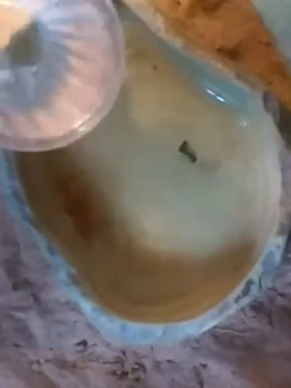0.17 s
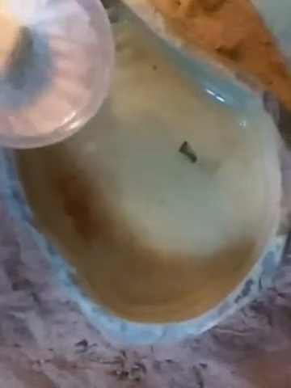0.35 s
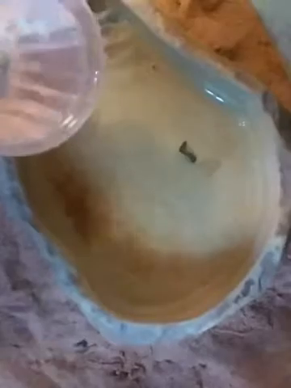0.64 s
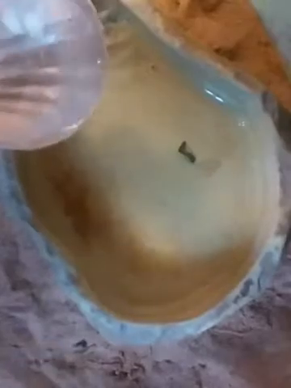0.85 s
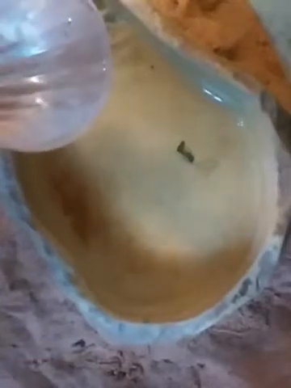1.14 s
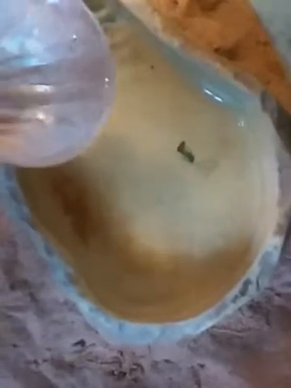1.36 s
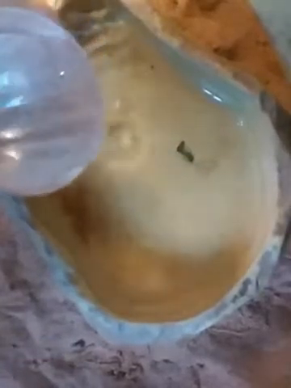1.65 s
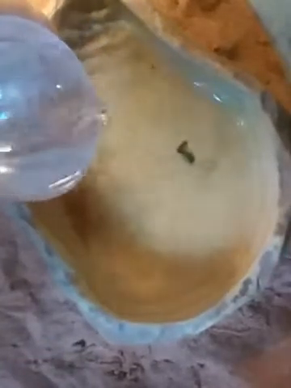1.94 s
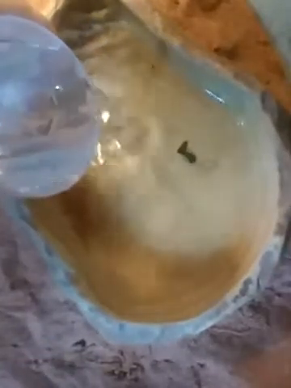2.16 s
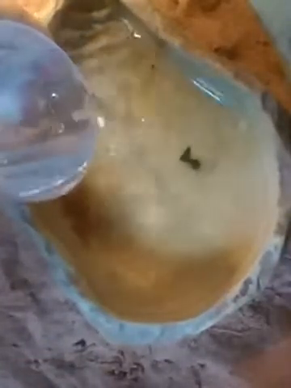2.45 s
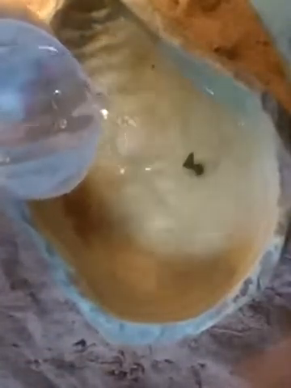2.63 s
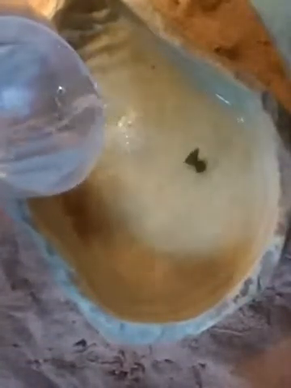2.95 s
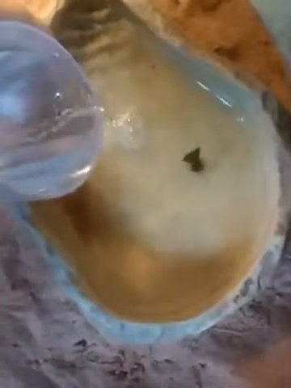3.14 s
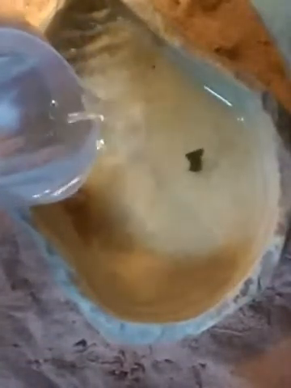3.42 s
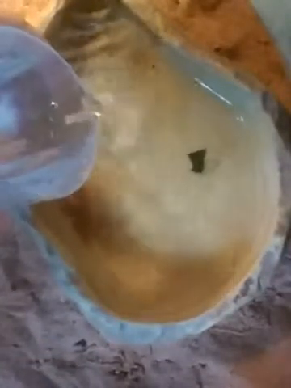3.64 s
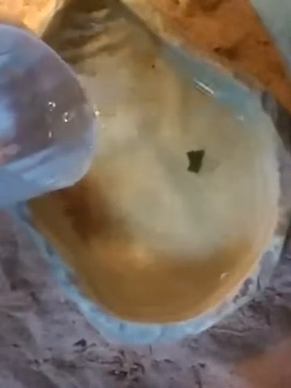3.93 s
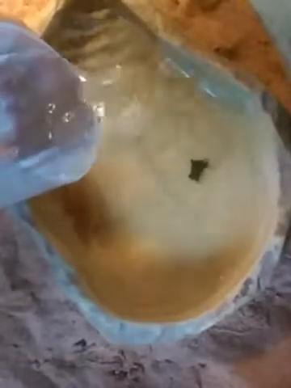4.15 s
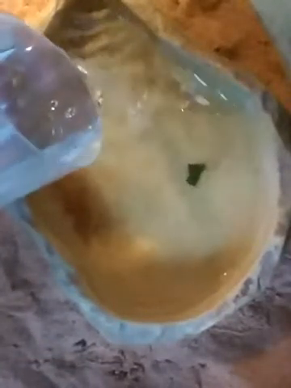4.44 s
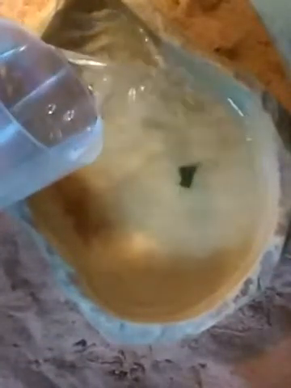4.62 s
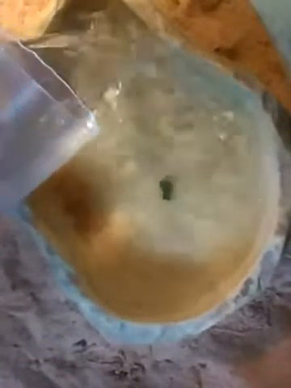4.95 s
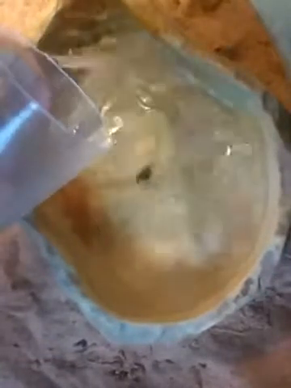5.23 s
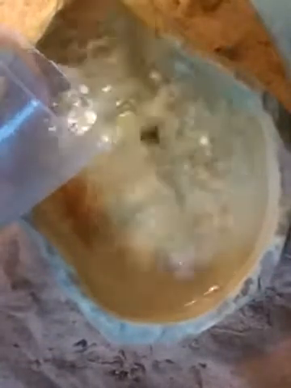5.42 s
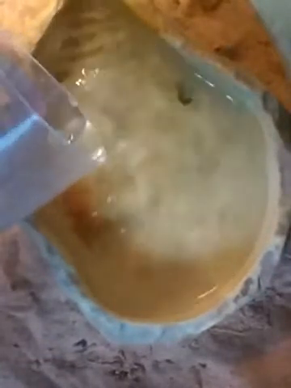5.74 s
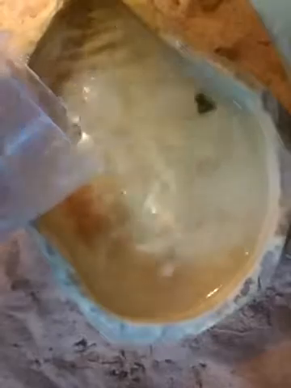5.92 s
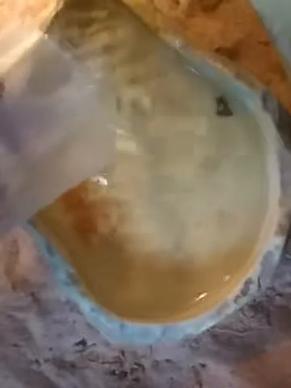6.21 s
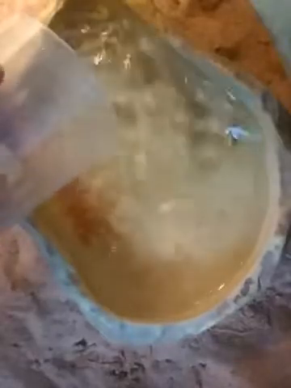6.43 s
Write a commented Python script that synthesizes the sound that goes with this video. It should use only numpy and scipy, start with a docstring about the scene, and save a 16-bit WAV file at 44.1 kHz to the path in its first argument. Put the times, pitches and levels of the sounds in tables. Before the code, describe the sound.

A small room with faint hiss and low, wavering rumble, heard through a small close microphone. Tiny handling taps come first, then a dull, boomy bump on a wooden table at 0.4 s. From 0.8 s a very faint, grainy scrape grows with light taps, a sharper tap at 1.16 s, and ends in a loud, hard wooden clack at 1.24 s that rattles and rings for under half a second. Near quiet follows, with a faint tap at 1.6 s. At 1.8 s the first drop ticks and plinks; from 2.1 s to 4 s drops and broken dribbles come in spurts, bubbles ringing around 1 to 1.6 kHz, often gliding upward, with crisp bright splashes. A strong plink lands at 3.5 s and a bright splash at 3.8 s. After 4.1 s the water is softer, smoother and quieter, trickling in short surges with weak drips until 6.5 s.

```python
"""Water is tipped from a plastic cup into a shallow dish: single drops, then a broken dribble, then a smoother stream.
Each drop slaps the surface with noise and may trap air bubbles, which ring as short sines with gliding pitch.
Before the water, dull bumps, a faint scrape and a hard clack are heard on wooden furniture.
The wood sounds as dying sines plus a dense rattle of noise; the scrape is grainy noise that grows.
A small room echoes the water and the bumps, over filtered noise for its hiss and low, wavering rumble."""
import sys
import numpy as np
from scipy import signal
from scipy.fft import rfft, irfft
from scipy.io import wavfile
from scipy.ndimage import uniform_filter1d

SR = 44100
rng = np.random.default_rng(int(sys.argv[2]) if len(sys.argv) > 2 else 0)


def to_wav(s):
    """Save 16-bit WAV."""
    ch = np.atleast_2d(s).T  # columns
    pcm = np.round(np.clip(ch, -1, 1) * 32767)  # PCM
    wavfile.write(sys.argv[1], SR, pcm.astype(np.int16))


N = 289723
TIME = np.arange(N) / SR

# colour of the room's hiss and rumble: [f/Hz, relative level/dB]
AIR_COLOUR = [(25, -15.5), (55, -7), (90, -3), (120, -2.5), (180, -10), (240, 2), (330, -16), (600, -12),
              (1200, -20), (3000, -27), (6000, -25), (15000, -29.5)]
# dull bumps against the table: [t/s, boom level/dB, body level/dB, rap level/dB, click level/dB, contact time/s]
BUMPS = [(0.085, -93, -48.5, -75, -96, 0.0029), (0.338, -75, -48, -53, -54.5, 0.0079),
         (0.394, -24, -27.5, -31, -44, 0.00077), (1.922, -55, -45, -48, -70.5, 0.0047)]
# hard knocks and handling taps on wood: same columns as the bumps
KNOCKS = [(0.184, -82, -89, -79, -56, 0.0097), (0.197, -69, -92, -63, -48, 0.0035),
          (0.223, -80, -99, -67, -56, 0.0032), (0.248, -73, -80.5, -58.5, -40.5, 0.0024),
          (0.302, -70, -81, -69, -53, 0.0023), (0.808, -63, -75, -83, -52.5, 0.0014),
          (0.885, -59.5, -68.5, -74.5, -55.5, 0.019), (0.991, -58, -42, -45, -48.5, 0.0099),
          (1.058, -41.5, -33.5, -36, -35, 0.014), (1.158, -43.5, -44.5, -42, -19, 0.012),
          (1.19, -40.5, -41, -38, -37, 0.0037), (1.240, -23.5, -22, -18.5, -12.5, 0.0042),
          (1.569, -50, -46, -57.5, -50, 0.0046)]
# pitches at which the boom, body, rap and click levels apply: [f/Hz]
BLOW_RANGES = [125, 300, 1100, 4500]
# notes of the bumped table: [f/Hz, relative level/dB, time to fall 60 dB/s]
TABLE_MODES = [(118.7, 2.5, 0.32), (163, -4.5, 0.42), (227, -5, 0.41), (260.7, 1.5, 0.32), (404, 0, 0.23),
               (570, -4, 0.089), (820, -17, 0.063), (1057, 5.5, 0.031), (1270, 6.5, 0.034),
               (1950, 1.5, 0.093)]
# notes of the knocked wood: [f/Hz, relative level/dB, time to fall 60 dB/s]
WOOD_MODES = [(114.5, 1.5, 0.49), (205, -1.5, 0.42), (248.3, -2, .65), (360, -14, 0.7), (412.4, -7.5, 0.52),
              (468, -4.5, 0.27), (601, -6.5, 0.39), (728, -10.5, 0.27), (832, -12, 0.23),
              (1000, -10.5, 0.4), (1395, -16.5, 0.07), (2283, -15, 0.12), (2880, -11, 0.17),
              (3486, -16.5, 0.13), (4220, -14, 0.18), (4640, -20, 0.098)]
# dense rattle of struck wood:
# [f/Hz, relative level/dB, time to fall 60 dB/s, relative level of slow tail/dB, tail's time to fall 60 dB/s]
RATTLE = [(61, -29, 0.094, -18, 0.27), (114, -12.5, 0.18, -4.5, 0.86), (283, -13, 0.073, -4, 0.59),
          (580, -9, 0.1, -4.5, .5), (1200, -11, 0.11, -8.5, 0.39), (2280, -10, 0.14, -7.5, 0.23),
          (3700, -9.5, 0.11, -17, 0.48), (6250, 2, 0.072, -19.5, 0.34), (8940, -13.5, 0.074, -20.5, 0.4),
          (15000, -31, 0.031, -18, 0.3)]
# colour of the room's echo: [f/Hz, relative level/dB, time to fall 60 dB/s]
ROOM_COLOUR = [(155, 1, 0.25), (1100, 6, 0.19), (2550, 9.5, 0.21), (5350, 0.5, 0.22), (9100, 0, 0.36),
               (15000, -7.5, 0.14)]
# when something slides over the wood: [start t/s, end t/s]
SLIDE_SPAN = (.81, 1.235)
# loudness of the slide: [level at start/dB, level at end/dB]
SLIDE_LEVELS = (-71, -49.5)
# colour of the slide: [f/Hz, relative level/dB]
SLIDE_COLOUR = [(100, 4), (300, 5), (1000, -4.5), (1800, -10), (2800, -2.5), (3800, -10), (5200, -3),
                (8000, -15), (15000, -25)]
# heavy drops hitting the water: [t/s, centre f/Hz, level/dB, spread of the spray's pitches/octaves]
SPLASHES = [(1.815, 4835, -32.5, .46), (2.128, 5820, -38, 0.2), (2.154, 5400, -41.5, 0.34),
            (2.288, 5800, -35, 0.16), (2.33, 4970, -37.5, 0.47), (2.402, 4880, -38, 0.17),
            (2.454, 8880, -34, .07), (2.531, 5800, -42, 0.4), (2.603, 5180, -37.5, 0.47),
            (2.671, 7740, -35.5, 0.13), (2.752, 6370, -31.5, 0.37), (2.78, 5700, -30, 0.35),
            (3.005, 4750, -45, 0.18), (3.039, 5210, -33.5, 0.29), (3.333, 4030, -50, 0.25),
            (3.356, 5650, -36, 0.36), (3.466, 5580, -37, 0.42), (3.534, 4750, -32.5, 0.49),
            (3.669, 6240, -41.5, 0.35), (3.716, 5500, -39, .41), (3.802, 8260, -38, 0.29),
            (3.822, 5830, -25.5, 0.2), (3.861, 5220, -42, 0.35), (4.005, 5140, -35, 0.325),
            (4.048, 6680, -39.5, 0.24), (4.119, 5820, -48.5, 0.056), (4.292, 5500, -48.5, 0.19),
            (4.486, 4270, -50.5, 0.099), (4.82, 5540, -47.5, 0.06), (4.869, 4430, -40, 0.41),
            (5.244, 6380, -46, 0.33), (5.404, 5800, -41, 0.2), (5.443, 6060, -44, 0.25),
            (5.571, 6960, -45.5, 0.16), (5.674, 6360, -46, 0.18), (6.013, 5770, -48, .14),
            (6.136, 6070, -38, 0.14), (6.214, 5440, -44.5, 0.12)]
# large bubbles that stand out as notes: [t/s, starting f/Hz, level/dB, pitch glide/(starting pitches per s)]
BUBBLES = [(1.816, 1607, -28.5, 14.5), (2.108, 1014, -35, 13), (2.154, 900, -20.5, -2),
           (2.177, 1054, -24.5, 42), (2.344, 817, -40, 10.5), (2.403, 1050, -22, 21),
           (2.415, 1543, -26.5, 0.5), (2.514, 1530, -25.5, -6), (2.695, 1246, -26, 28),
           (2.742, 1306, -25.5, 20), (2.78, 1216, -26, 10), (2.813, 1335, -22, 13), (2.833, 1320, -24, -4),
           (2.847, 1187, -24.5, 5.5), (3.003, 1060, -28, 21.5), (3.039, 1650, -27.5, 0),
           (3.292, 1060, -44, 0), (3.409, 1262, -23.5, -7), (3.535, 1506, -13.5, 11), (3.619, 1313, -25, 4),
           (3.634, 1247, -27.5, -1), (3.823, 1514, -27.5, 10.5), (3.857, 1470, -25, 2.5),
           (3.861, 1048, -21.5, -1), (4.024, 1043, -26.5, 11), (4.304, 1040, -32.5, -0.5),
           (4.686, 1120, -42, 1.5), (5.217, 1450, -39.5, 2.5), (5.242, 1300, -37, 0.5),
           (5.295, 1023, -41.5, -1), (5.551, 1467, -41.5, 9), (5.61, 965, -38, 1.5),
           (5.613, 1355, -36.5, -3.5), (5.666, 914, -41.5, 4), (5.953, 1920, -46.5, 6),
           (6.239, 1127, -38.5, -5.5), (6.268, 780, -39.5, 0), (6.303, 1760, -45, -4),
           (6.453, 1344, -52, 9)]
# from broken dribble to smooth stream: [t/s, smoothness/0 to 1]
SMOOTHNESS = [(4.0, 0), (4.2, 1)]
# each tip of the cup lets water run: [start t/s, end t/s, gurgle level/dB, trickle level/dB, fizz level/dB]
POURS = [(2.244, 2.5, -69.5, -59.5, -59.5), (2.455, 3.004, -55, -56, -54.5),
         (3.281, 3.436, -60, -60.5, -58), (3.526, 4.038, -54.5, -66.5, -58),
         (4.128, 4.39, -61.5, -61.5, -63.5), (4.47, 4.993, -59.5, -58.5, -62),
         (5.137, 5.668, -72.5, -62.5, -58), (5.728, 6.204, -88, -90, -63.5), (6.22, 6.345, -63, -63.5, -67),
         (6.443, 6.56, -74, -60.5, -59)]
# strength of the stream's large bubbles by pitch: [f/Hz, relative level/dB]
GURGLE_SIZES = [(1000, -10.5), (1200, 1), (1500, 0)]
# strength of its middling bubbles by pitch: [f/Hz, relative level/dB]
TRICKLE_SIZES = [(1600, -8.5), (2300, -0.5), (3800, 4.5)]
# strength of its tiny bubbles by pitch: [f/Hz, relative level/dB]
FIZZ_SIZES = [(3700, -18), (5000, 3.5), (6300, 0), (8000, 0), (10000, -18.5), (14000, 3.5)]
# flow breaking into a chain of drops, as typical values:
# [start t/s, end t/s, rate/(drops per s), bubble f/Hz, bubble level/dB, splash level/dB]
DRIBBLES = [(2.55, 3.005, 30, 1270, -32.5, -49), (3.647, 3.81, 38, 1210, -34, -48.5),
            (4.179, 4.3, 28, 1412, -44, -57.5), (4.53, 4.83, 23.9, 1172, -46.5, -65.5),
            (5.541, 5.66, 40, 1366, -48, -52), (5.789, 6.0, 18, 1265, -80, -59)]


def undb(db):
    """Turn decibels into a gain."""
    return 10 ** (np.asarray(db) / 20)


def unit(x):
    """Scale a sound to an average (rms) strength of 1."""
    return x / np.sqrt(np.mean(x ** 2) + 1e-30)


def at_pitch(table, hz, column=1):
    """Read one column of a frequency table between its rows, with pitch on a log scale."""
    rows = np.array(table)
    return np.interp(np.log(np.maximum(hz, 1)), np.log(rows[:, 0]), rows[:, column])


def seconds(length):
    """Make a time axis of about the given length in seconds."""
    return np.arange(int(length * SR) + 2) / SR


def add(track, start, sound):
    """Mix a sound into the track at a time in seconds, cutting what runs past the end."""
    i = min(max(int(start * SR), 0), len(track))
    track[i:i + len(sound)] += sound[:len(track) - i]


def lowcut(x, hz, order):
    """Weaken what lies below a frequency."""
    return signal.sosfilt(signal.butter(order, hz, "high", fs=SR, output="sos"), x)


def noise(size, lo_hz, hi_hz):
    """Make noise of rms 1 between two frequencies."""
    sos = signal.butter(3, [lo_hz, hi_hz], "band", fs=SR, output="sos")
    settled = signal.sosfilt(sos, rng.standard_normal(2 * size))[size:]  # skip the filter's start-up
    return unit(settled)


def half_octaves(size):
    """Make unrelated noise bands, each half an octave wide, with their centre frequencies."""
    edges = 50 * 2 ** (np.arange(18) / 2)
    return [(np.sqrt(lo * hi), noise(size, lo, hi)) for lo, hi in zip(edges, edges[1:])]


def coloured_noise(colour):
    """Make noise as long as the scene whose loudness over pitch follows a table."""
    hz = np.arange(N // 2 + 1) * SR / N
    return irfft(rfft(rng.standard_normal(N)) * undb(at_pitch(colour, hz)), N)


def air(level_db=-64.5, waver_db=2.0):
    """The room's steady faint hiss, and its low rumble whose loudness wavers slowly."""
    hz = np.arange(N // 2 + 1) * SR / N
    still = unit(coloured_noise(AIR_COLOUR))
    rumble = irfft(rfft(still) * (hz < 500), N)
    hiss = still - rumble
    waver = unit(irfft(rfft(rng.standard_normal(N)) * (hz < 12), N))
    return (hiss + rumble * undb(waver_db * waver)) * undb(level_db)


def wood_ring(blow, modes, t, swell_cycles):
    """The clear notes of struck wood: sines that build up, low ones more slowly, and then die away."""
    ring = np.zeros(len(t))
    for index, (hz, db, t60) in enumerate(modes):
        swell = 1 - np.exp(-t * hz / swell_cycles)
        side = (-1) ** index  # neighbouring notes swing opposite ways
        fade = undb(-60 * t / t60)
        ring += side * undb(db + at_pitch(blow, hz)) * swell * fade * np.sin(2 * np.pi * hz * t)
    return ring


def wood_rattle(blow, bands, t, linger_db, chatter_db):
    """The dense rattle of struck wood: noise bands with an uneven quick part and a slower tail."""
    chatter = unit(undb(chatter_db * unit(noise(len(t), 28, 420))))  # the faces bounce unevenly
    offset = rng.integers(len(t))  # a fresh stretch of the noise for each blow
    rattle = np.zeros(len(t))
    for hz, band in bands:
        db, t60, tail_db, tail_t60 = (at_pitch(RATTLE, hz, column) for column in range(1, 5))
        quick = chatter * undb(-60 * t / t60)
        tail = undb(tail_db + linger_db * (hz < 2500)) * undb(-60 * t / tail_t60)
        rattle += undb(db + at_pitch(blow, hz)) * band[offset:offset + len(t)] * (quick + tail)
    return rattle


def blows(events, modes, modes_db, rattle_db, linger_db, chatter_db, swell_cycles):
    """Blows on wood: notes and rattle weighted by each blow's tone, fading in over its contact time."""
    out, t = np.zeros(N), seconds(.7)
    bands = half_octaves(2 * len(t))
    for start, *levels, contact in events:
        blow = list(zip(BLOW_RANGES, levels))
        ring = wood_ring(blow, modes, t, swell_cycles)
        rattle = wood_rattle(blow, bands, t, linger_db, chatter_db)
        onset = np.minimum(t / contact, 1)
        add(out, start, onset * (undb(modes_db) * ring + undb(rattle_db) * rattle))
    return out


def bumps():
    """Dull bumps that make the table boom briefly."""
    return blows(BUMPS, TABLE_MODES, modes_db=-1.5, rattle_db=-0.5, linger_db=-4, chatter_db=9, swell_cycles=0.8)


def room(x, near_db=-13, near_s=0.0063, tail_db=-13):
    """The dish and the table throw back quick reflections; the walls add a soft tail, its fade set by pitch."""
    t = seconds(.7)
    near = rng.standard_normal(len(t)) * np.exp(-t / near_s) * (t > .002)
    tail = np.zeros(len(t))
    for hz, band in half_octaves(len(t)):
        fade = undb(-60 * t / at_pitch(ROOM_COLOUR, hz, 2))
        # wider bands need more strength: the root of hz keeps the noise even
        tail += band * np.sqrt(hz) * undb(at_pitch(ROOM_COLOUR, hz)) * fade
    tail = tail * np.clip(t / 0.0012, 0, 1)
    echo = undb(near_db) * near / np.linalg.norm(near) + undb(tail_db) * tail / np.linalg.norm(tail)
    return x + signal.fftconvolve(x, echo)[:N]


def knocks():
    """Handling taps and one hard clack on wood that rings on."""
    return blows(KNOCKS, WOOD_MODES, modes_db=-2.5, rattle_db=-1, linger_db=4.5, chatter_db=2.0, swell_cycles=0.67)


def slide(catch_db=4, edge_s=0.017):
    """A faint scrape: noise made grainy by fast random loudness changes, growing until the clack."""
    start, end = SLIDE_SPAN
    grainy = unit(coloured_noise(SLIDE_COLOUR) * undb(catch_db * noise(N, 15, 200)))
    touching = np.clip(np.minimum(TIME - start, end - TIME) / edge_s, 0, 1)
    return touching * grainy * undb(np.interp(TIME, SLIDE_SPAN, SLIDE_LEVELS))


def smoothness(when):
    """How smoothly the water runs at a time, from 0 to 1."""
    return np.interp(when, *np.transpose(SMOOTHNESS))


def bubble(hz, t60, rise, swell_cycles):
    """An air bubble: a dying sine whose pitch glides, upward when rise is positive."""
    t = seconds(t60)
    swell = 1 - np.exp(-t * hz / swell_cycles)
    return swell * undb(-60 * t / t60) * np.sin(2 * np.pi * hz * (t + rise * t * t / 2))


def splashes(drops, slap_db=8, slap_s=0.0023, scatter_s=0.0016, cycles=52, cluster_db=7, low_hz=2100, count=8):
    """Each drop slaps the surface and leaves tiny bubbles; close pitches give one clear, soft-edged tick."""
    out, t = np.zeros(N), seconds(.03)
    for start, hz, db, spread in drops:
        steps = rng.permutation(np.linspace(-1.6, 1.6, count))
        pitches = np.clip(hz * 2 ** (spread * steps), 1500, 14000)
        delays = rng.exponential(scatter_s, count)
        drop = undb(slap_db) * spread ** 2 * noise(len(t), 1000, 10800) * np.exp(-t / slap_s)
        add(drop, 0, bubble(hz, cycles / hz, rise=4, swell_cycles=4))
        for pitch, delay in zip(pitches, delays):
            tiny = bubble(pitch, cycles / pitch, rise=6, swell_cycles=3)
            add(drop, delay, undb(cluster_db) * spread * tiny)
        drop = lowcut(drop, low_hz, order=2)
        loudness = np.sqrt(np.mean(drop[:SR // 180] ** 2))  # judged by the drop's first moments
        add(out, start, undb(db) * drop / loudness)
    return out


def plinks(bubbles, cycles=55.5, smooth_ring=0.37, slap_db=-15, slap_s=0.0009):
    """Large bubbles that ring as notes, the lower the longer; before the flow is smooth each starts with a slap."""
    out, t = np.zeros(N), seconds(0.018)
    for start, hz, db, rise in bubbles:
        smooth = smoothness(start)
        t60 = cycles / hz * (1 + smooth_ring * smooth)
        add(out, start, undb(db) * bubble(hz, t60, rise, swell_cycles=0.96))
        slap = noise(len(t), 1800, 8400) * np.exp(-t / slap_s)
        add(out, start, (1 - smooth) * undb(db + slap_db) * slap)
    return out


def flow(start, end, attack_s=0.018, release_s=0.056):
    """One tip of the cup: the flow swells, holds and dies away."""
    swell = 1 - np.exp(-np.maximum(TIME - start, 0) / attack_s)
    return swell * np.exp(-np.maximum(TIME - end, 0) / release_s)


def swarm(droplets, lo_hz, hi_hz, cycles, sizes, count, dull_db=-3):
    """Droplets shed brief bubbles; in a smooth stream these come later, start softer, ring longer and are duller."""
    out = np.zeros(N)
    for start, weight_db in droplets:
        smooth = smoothness(start)
        place, lag, damping = rng.random((3, count))
        pitches = lo_hz * (hi_hz / lo_hz) ** place
        gains = undb(weight_db + at_pitch(sizes, pitches) + dull_db * smooth * (2.0 + place))
        t60s = cycles * (.5 + damping) * (1 + 1.2 * smooth) / pitches
        delays = (.006 + .025 * smooth) * lag ** 2
        for hz, gain, t60, delay in zip(pitches, gains, t60s, delays):
            add(out, start + delay, gain * bubble(hz, t60, rise=3, swell_cycles=2 + 2 * smooth))
    return unit(out)


def stream(rate=190, scatter_db=4, spray_db=-9, smooth_spray_db=-4, surge_db=3.0, surge_hz=18):
    """An unevenly surging stream: its droplets gurgle, trickle and fizz at once, in a wash of fine spray."""
    when, size = rng.random((int(rate * N / SR), 2)).T  # rate is in droplets per second
    weights_db = scatter_db * np.minimum(-np.log(1 - size), 3)  # few droplets are strong
    droplets = list(zip(when * N / SR, weights_db))
    gurgle = swarm(droplets, 1000, 1500, cycles=45, sizes=GURGLE_SIZES, count=1)
    trickle = swarm(droplets, 1600, 3800, cycles=34, sizes=TRICKLE_SIZES, count=2)
    fizz = swarm(droplets, 3700, 13000, cycles=32, sizes=FIZZ_SIZES, count=2)
    fizz = fizz + undb(spray_db + smooth_spray_db * smoothness(TIME)) * noise(N, 4500, 21050)
    surge = unit(undb(surge_db * noise(N, surge_hz / 2, surge_hz * 2)))
    water = np.zeros(N)
    for start, end, gurgle_db, trickle_db, fizz_db in POURS:
        mix = gurgle * undb(gurgle_db) + trickle * undb(trickle_db) + fizz * undb(fizz_db)
        water += flow(start, end) * mix
    return surge * water


def dribble(jitter=.25, pitch_octaves=0.095, spray_hz=5300, spray_octaves=.22, scatter_db=3.0, rise=7, spread=0.203):
    """A thin flow pinches off drops at a loosely even pace; returns rows for their bubbles and their splashes."""
    bubbles, drops = [], []
    for start, end, rate, hz, bubble_db, splash_db in DRIBBLES:
        chance = rng.standard_normal((64, 7))
        for when, (late, size, force, glide, spray, slap, width) in zip(np.arange(start, end, 1 / rate), chance):
            when = when + jitter * late / rate
            climb = rise * (1 + glide) * (1 - smoothness(when))
            pitch = hz * 2 ** (pitch_octaves * size)
            bubbles.append((when, pitch, bubble_db + scatter_db * force, climb))
            centre = spray_hz * 2 ** (spray_octaves * spray)
            drops.append((when, centre, splash_db + scatter_db * slap, spread * 2 ** (width / 2)))
    return bubbles, drops


def suppress(x, threshold_db=-62, slope=0.62, depth_db=10, window_s=0.018, sense_hz=1000):
    """A noise suppressor turns everything down when little sounds above the rumble."""
    power = uniform_filter1d(lowcut(x, sense_hz, order=2) ** 2, int(window_s * SR))
    below_db = threshold_db - 10 * np.log10(np.maximum(power, 1e-14))
    return x * undb(-np.clip(slope * below_db, 0, depth_db))


def scene():
    """Bumps, a scrape and knocks, then the pouring; the room echoes the water and the bumps."""
    bubbles, drops = dribble()
    water = plinks(BUBBLES + bubbles) + splashes(SPLASHES + drops) + stream()
    return (room(water + bumps()) + slide() + knocks() + air())[None]


def record(dry, ceiling=.7, top_hz=16500):
    """The small microphone loses deep bass and rounds peaks; the recorder quietens pauses and cuts the top."""
    rounded = ceiling * np.tanh(lowcut(dry, hz=68, order=3) / ceiling)
    quietened = suppress(rounded)
    return signal.sosfilt(signal.ellip(10, .2, 70, top_hz, fs=SR, output="sos"), quietened)


dry = scene()
out = record(dry)
to_wav(out)
```